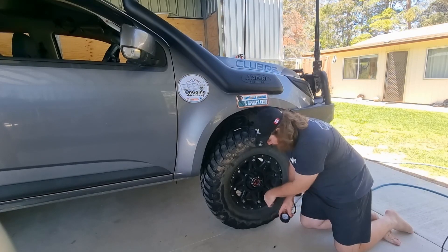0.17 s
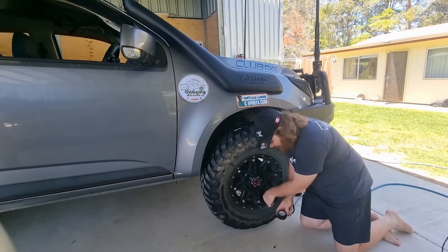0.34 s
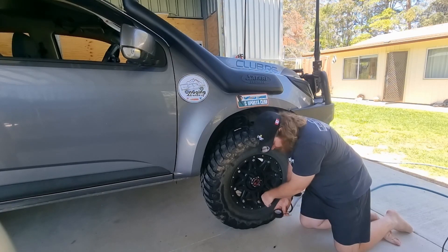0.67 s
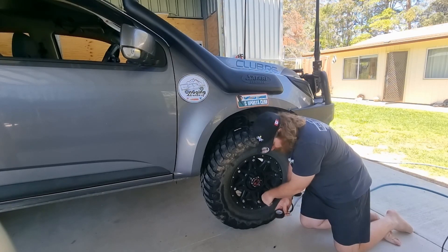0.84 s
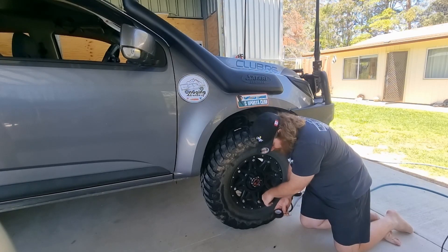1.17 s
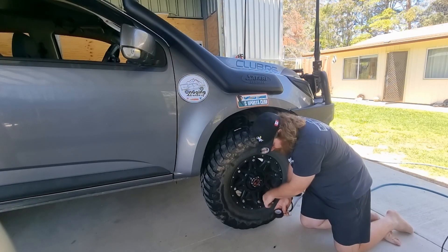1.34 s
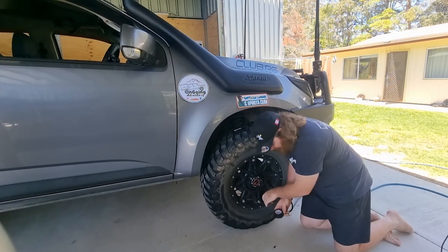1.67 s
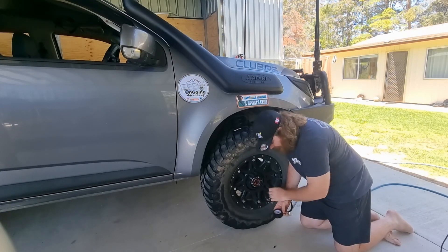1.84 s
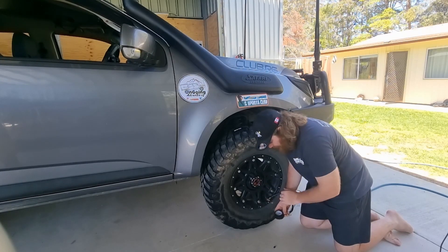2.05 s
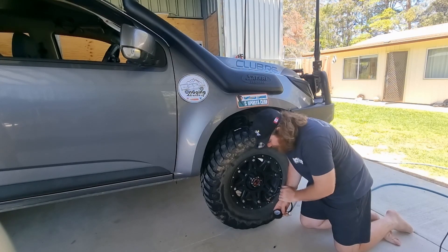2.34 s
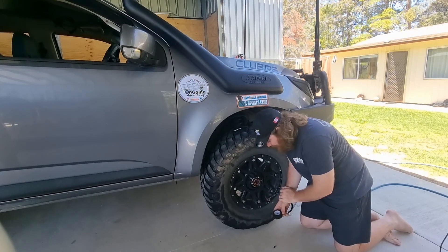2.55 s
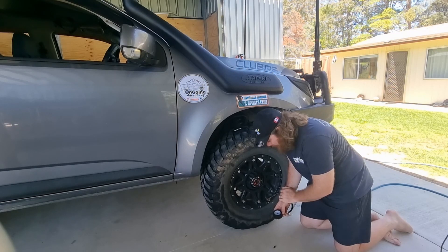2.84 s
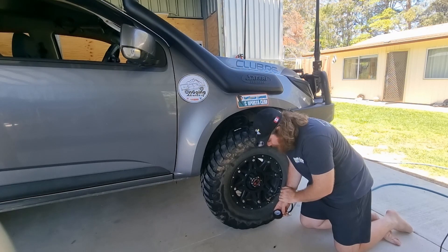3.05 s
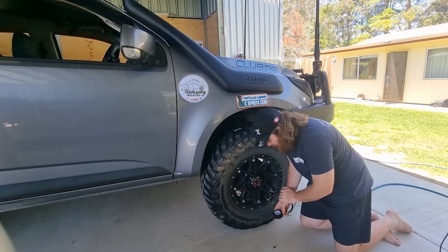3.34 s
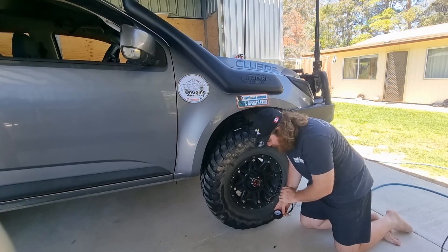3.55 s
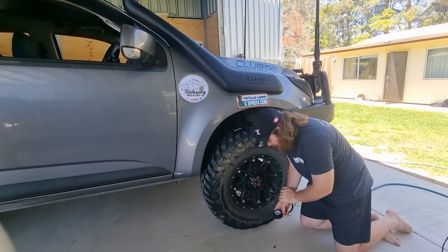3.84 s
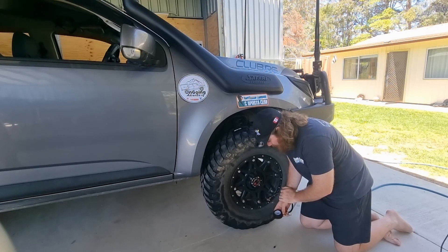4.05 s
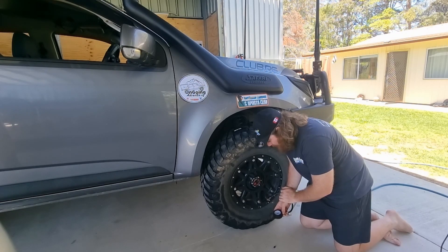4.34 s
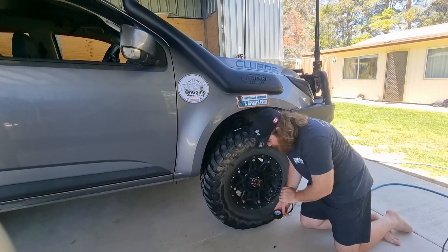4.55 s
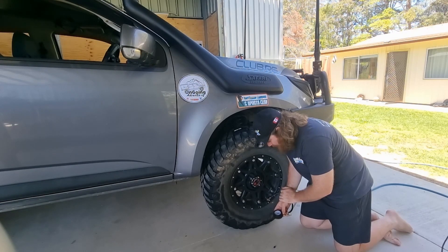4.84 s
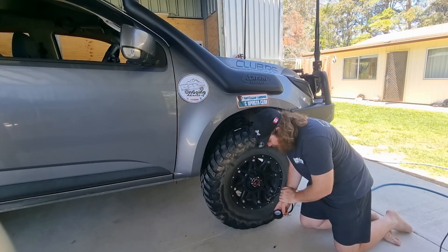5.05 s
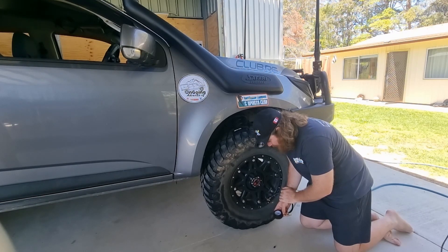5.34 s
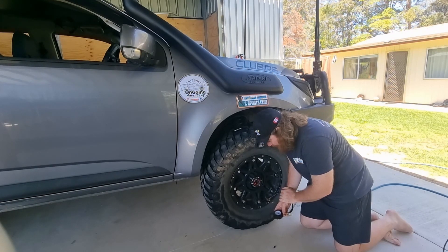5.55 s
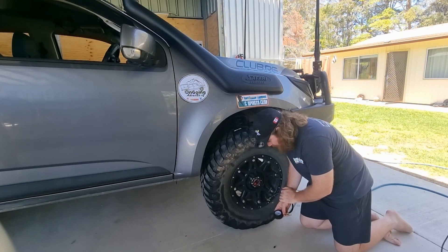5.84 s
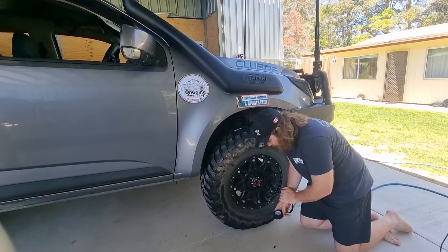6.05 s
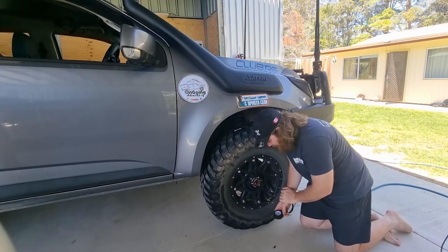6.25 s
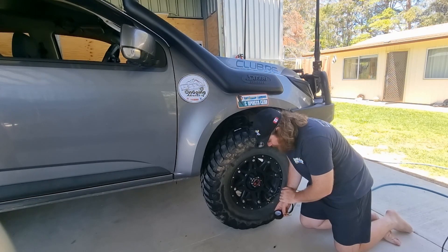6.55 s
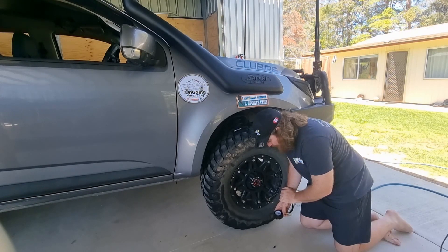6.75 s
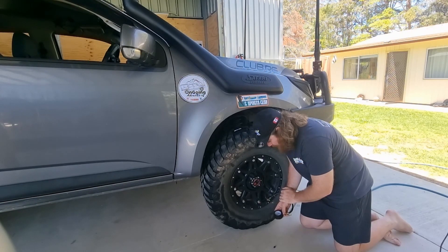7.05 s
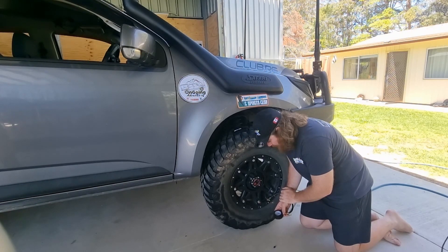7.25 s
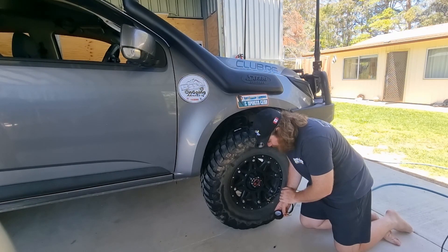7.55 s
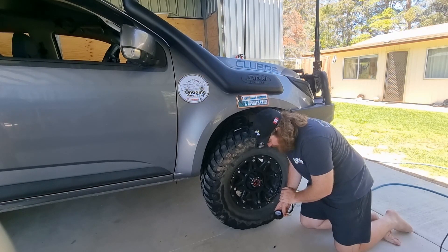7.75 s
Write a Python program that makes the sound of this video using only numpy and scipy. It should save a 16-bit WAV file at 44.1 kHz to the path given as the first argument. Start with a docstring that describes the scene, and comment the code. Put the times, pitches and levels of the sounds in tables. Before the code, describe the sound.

Bright, strong air hiss from a vehicle tyre pinches off by stages, pauses, then bursts back abruptly and holds steady with tiny dips.

```python
"""A vehicle tyre is let down through a hand-held deflator on a concrete drive beside a house.
The jet is shaped noise: throttled off in three moves, reopened abruptly, then steady with a few brief dips.
Hands and wheel rim colour it with peaks and notches that change with each grip; car, slab and walls add
a short tail of decaying noise. A faint outdoor murmur of shaped noise lies underneath, alike in both ears."""
import sys
import numpy as np
from scipy import signal
from scipy.fft import rfft, irfft, next_fast_len
from scipy.io import wavfile

SR = 44100
rng = np.random.default_rng(int(sys.argv[2]) if len(sys.argv) > 2 else 0)


def materialize(psi):
    """Save the field psi as 16-bit PCM at rate SR to the path in sys.argv[1].

    A 1-D psi becomes a single channel; in a 2-D psi each row is a channel.
    """
    bounded = np.clip(np.atleast_2d(psi).T, -1, 1)
    quanta = np.round(bounded * 32767).astype(np.int16)
    wavfile.write(sys.argv[1], SR, quanta)


N = 348831
TIME = np.arange(N) / SR   # seconds


def from_db(db):
    """Decibels to amplitude gain."""
    return 10 ** (np.asarray(db) / 20)


def rms(x):
    """Root mean square."""
    return np.sqrt(np.mean(x ** 2) + 1e-20)


def in_time(rows):
    """Each column of a table against its first, the time, joined by straight lines."""
    seconds, *columns = np.transpose(rows)
    return [np.interp(TIME, seconds, column) for column in columns]


def at_hz(points, hz):
    """A spectrum in dB, read on a log-frequency axis."""
    knots_hz, db = np.transpose(points)
    return np.interp(np.log(hz + 1), np.log(knots_hz), db)


def shaped(x, gain_at):
    """Filter by a gain given as a function of frequency."""
    size = next_fast_len(x.shape[-1] + 2048)
    hz = np.arange(size // 2 + 1) * SR / size
    filtered = irfft(rfft(x, size) * gain_at(hz), size)
    return filtered[..., :x.shape[-1]]


def below(hz, edge_hz, order=6):
    """Low-pass gain with a soft edge, one half at the edge."""
    return 1 / (1 + (hz / edge_hz) ** order)


def drift(rate_hz):
    """Random wandering of rms 1, mostly slower than the given rate."""
    wander = shaped(rng.standard_normal(N), lambda hz: below(hz, rate_hz, order=2))
    return wander / rms(wander)


def valve_flow():
    """Flow as a share of the fully open valve; each move starts quickly and settles on its new opening."""
    # Three moves that pinch the valve off, then one that reopens it.
    # Each row: start in seconds, settling time constant in seconds, flow approached in dB re fully open.
    valve_moves = [(0.490, 0.062, -20.5), (0.657, 0.007, -29.5), (0.740, 0.033, -68), (1.355, 0.0036, -0.5)]
    flow_db = np.zeros(N)
    for start_s, settle_s, reached_db in valve_moves:
        done = 1 - np.exp(-np.maximum(TIME - start_s, 0) / settle_s)
        flow_db = flow_db + done * (reached_db - flow_db)
    return from_db(flow_db)


def hollow_db(grip, hz):
    """The hollow between hands and rim: bell-shaped peaks and notches, summed in dB."""
    return sum(db * np.exp(-(2 * (hz - centre_hz) / width_hz) ** 2) for centre_hz, width_hz, db in grip)


def jet(flutter_db, sway_db):
    """Turbulence at the nozzle, coloured by the hands and scaled by the valve opening and the pressure left."""
    # Turbulent jet. Each row: frequency in Hz, relative density in dB per Hz.
    jet_spectrum = [(25, -40.7), (45, -30.5), (75, -21.7), (140, -17.6), (300, -16.7), (550, -15.2),
                    (1300, -16.8), (3700, -11.6), (5500, -13.8), (7500, -10.0), (9000, -7.0), (12000, -2.4),
                    (15500, 0.0)]
    # Peaks and notches of each grip. Each row: centre in Hz, width in Hz, height in dB.
    first_grip = [(430, 900, -1.5), (900, 90, 2.3), (2540, 280, 3.5), (3530, 190, 3.3), (4310, 900, 2.0),
                  (4690, 130, 4.0), (5210, 600, 1.4), (9600, 190, -2.8), (10080, 190, -2.4),
                  (11840, 280, -3.1), (12530, 130, -3.3), (13220, 600, 2.4), (13740, 130, -3.3),
                  (14300, 900, -1.3), (15290, 600, -3.0)]
    reopening_grip = [(690, 90, -2.9), (1080, 130, -2.3), (2240, 190, -2.1), (2580, 130, 2.7),
                      (2890, 900, 3.1), (3620, 600, 1.6), (4690, 600, 1.4), (5860, 900, -1.5),
                      (7880, 130, 3.6), (8700, 190, 3.6), (9950, 280, -4.1), (11070, 600, 2.4),
                      (11760, 600, -4.2), (12700, 130, -3.7), (13390, 130, -3.8), (14430, 600, -1.8),
                      (15290, 280, -4.0)]
    settling_grip = [(1250, 130, 1.5), (2450, 280, 1.2), (3060, 130, -2.6), (3920, 190, -1.5),
                     (4260, 190, 3.6), (4480, 130, -2.0), (5340, 400, -1.4), (5810, 280, 1.7),
                     (6980, 400, -1.5), (7620, 190, -1.8), (8180, 400, 2.8), (8700, 190, 2.7),
                     (8910, 130, -3.3), (9600, 190, -2.3), (11200, 280, -2.2), (12060, 130, 2.4),
                     (12450, 280, -1.6), (13740, 190, -4.2), (14560, 600, 2.8), (15250, 400, -3.1),
                     (15630, 190, 2.6)]
    held_grip = [(690, 130, -1.4), (3060, 280, -2.1), (4260, 280, 3.5), (4480, 130, -2.3), (4650, 130, 1.7),
                 (5430, 280, -1.7), (5860, 280, 1.7), (7020, 600, -1.1), (8230, 400, 3.5), (8700, 130, 3.6),
                 (8910, 130, -3.0), (9560, 280, -1.7), (9860, 190, 1.7), (10080, 130, -3.1),
                 (10420, 280, -1.7), (10810, 190, 1.8), (11330, 280, -2.1), (12060, 400, 2.6),
                 (12530, 280, -3.2), (12960, 280, 4.6), (13700, 90, -3.4), (13910, 600, -2.7),
                 (14640, 600, 2.5), (15290, 190, -1.8), (15460, 130, -5.0), (15680, 190, 2.0)]
    grips = [first_grip, reopening_grip, settling_grip, held_grip]
    # The hands move from grip to grip. Each row: time in seconds, grip number counted from 0.
    hands = [(0, 0), (.8, 0), (1.3, 1), (1.75, 1), (2.15, 2), (3.4, 2), (5.0, 3), (8, 3)]
    # The hands shield the jet more or less as they shift.
    # Each row: time in seconds, change of level in dB, extra body below the treble in dB.
    shielding = [(0, -1.2, 0), (0.3, -1.8, -0.1), (0.43, -1, 0), (1.38, 0.5, -0.5), (1.58, 0.3, -0.3),
                 (1.85, -0.4, -0.9), (2.5, 0.52, 0), (4.2, 0.2, 0), (7.9, 0, 0)]
    open_db = -16.5   # valve fully open on a full tyre, before shielding
    sag_db_per_s = 0.1135   # the hiss weakens as the tyre empties, per second of full flow
    body_edge_hz = 9000   # the treble starts here

    air = shaped(rng.standard_normal(N), lambda hz: from_db(at_hz(jet_spectrum, hz)))
    air = air / rms(air)
    grip_now, = in_time(hands)
    hiss = 0
    for number, grip in enumerate(grips):
        # neighbouring grips crossfade while the hands move
        share = np.maximum(1 - abs(grip_now - number), 0)
        hiss = hiss + share * shaped(air, lambda hz: from_db(hollow_db(grip, hz)))

    flow = valve_flow()
    shield_db, shield_body_db = in_time(shielding)
    air_spent_s = np.cumsum(flow) / SR   # in seconds of full flow
    level_db = open_db - sag_db_per_s * air_spent_s + shield_db
    unsteady_db = flutter_db * drift(44.4) + sway_db * drift(5.3)

    body = shaped(hiss, lambda hz: below(hz, body_edge_hz))
    treble = hiss - body
    return flow * from_db(level_db + unsteady_db) * (treble + from_db(shield_body_db) * body)


def driveway(x, wet_db, low_t60, high_t60, split_hz):
    """Car body, slab and walls scatter a short tail whose treble dies first; t60 in seconds."""
    age = TIME[:SR // 2]
    scatter = rng.standard_normal(len(age)) * (age > .003)   # first reflections after 3 ms
    low = shaped(scatter, lambda hz: below(hz, split_hz, order=4))
    high = scatter - low
    tail = low * from_db(-60 * age / low_t60) + high * from_db(-60 * age / high_t60)
    tail = tail / np.sqrt(np.sum(tail ** 2))
    return x + from_db(wet_db) * signal.fftconvolve(x, tail)[:N]


def outdoors(waver_db):
    """A distant, even murmur of wind and traffic: shaped noise whose level wavers slightly."""
    # Outdoor background. Each row: frequency in Hz, relative density in dB per Hz.
    outdoor_spectrum = [(20, -17.1), (35, -12.5), (55, -2.7), (85, 0.0), (130, -8.7), (220, -13.1),
                        (400, -13.3), (900, -10.9), (1500, -21.0), (2500, -27.0), (4300, -32.4),
                        (6000, -37.3), (9800, -39.5), (15500, -45.6)]
    level_db = -57.5   # middle of the waver
    murmur = shaped(rng.standard_normal(N), lambda hz: from_db(at_hz(outdoor_spectrum, hz)))
    return from_db(level_db + waver_db * drift(3.2)) * murmur / rms(murmur)


def dipped(x, half_length_s, width_hz, tone_db):
    """The lower part of the hiss sinks for a few hundredths of a second; one narrow band holds on as a faint tone."""
    # Brief dips. Each row: centre in seconds, gain at the centre in dB, upper edge of the dip in Hz,
    # centre in Hz of the narrow band that keeps sounding.
    brief_dips = [(2.021, -18, 9650, 2800), (2.173, -18.5, 13700, 12800), (2.835, -16, 12300, 8300),
                  (3.453, -17, 8600, 3670), (3.581, -18.5, 12400, 9770), (4.521, -19, 8300, 2470),
                  (4.798, -18, 9500, 8150), (6.889, -16, 8000, 7950), (7.550, -17, 7400, 7600)]
    out = x.copy()
    for centre_s, depth_db, edge_hz, kept_hz in brief_dips:
        near = abs(TIME - centre_s) < 2 * half_length_s
        offset = TIME[near] - centre_s
        nearness = np.maximum(1 - abs(offset) / half_length_s, 0)

        def kept(hz):
            return below(hz - kept_hz, width_hz / 2)

        def sinks(hz):
            return below(hz, edge_hz, order=24) * (1 - kept(hz))

        lost_share = 1 - from_db(depth_db * nearness ** 2)
        out[near] -= lost_share * shaped(x[near], sinks)
        # the tone's peak is set against the rms of the hiss in its band
        tone = np.hanning(len(offset)) ** 2 * np.sin(2 * np.pi * kept_hz * offset)
        out[near] += from_db(tone_db) * rms(shaped(x[near], kept)) * tone
    return out


def scene():
    """The hiss in its surroundings over the background, the same in both ears."""
    hiss = jet(flutter_db=0.2, sway_db=0.2)
    hiss = driveway(hiss, wet_db=-13, low_t60=.6, high_t60=.38, split_hz=6000)
    hiss = dipped(hiss, half_length_s=.019, width_hz=440, tone_db=7)
    mono = hiss + outdoors(waver_db=.4)
    return np.array([mono, mono])


def record(dry):
    """The microphone sheds the deepest bass; the top is cut steeply."""
    lean = shaped(dry, lambda hz: 1 - below(hz, 26, order=2))
    return shaped(lean, lambda hz: below(hz, 15790, order=900))


dry = scene()
out = record(dry)
materialize(out)
```